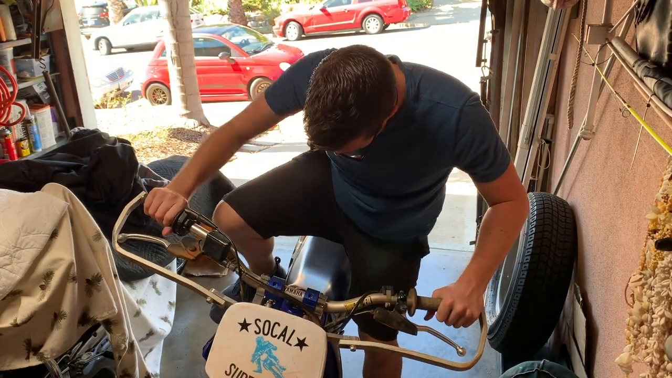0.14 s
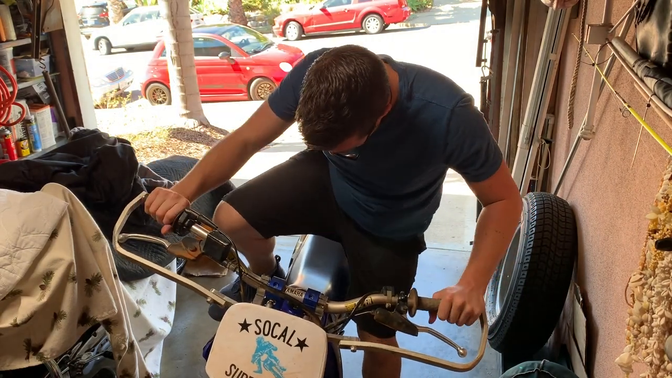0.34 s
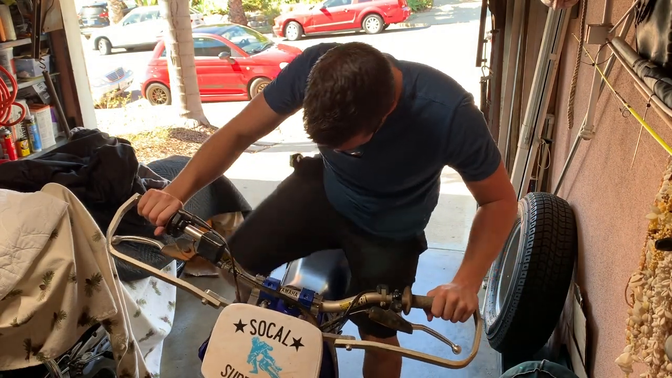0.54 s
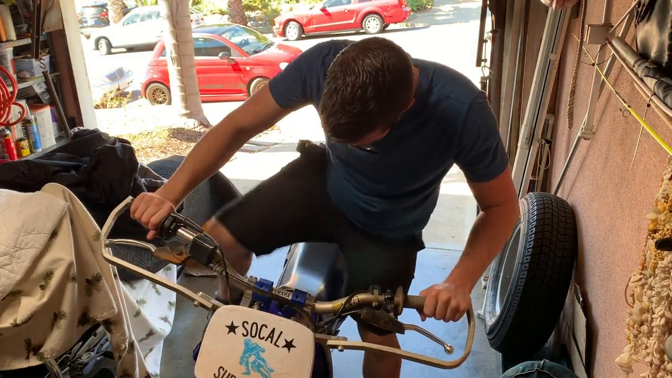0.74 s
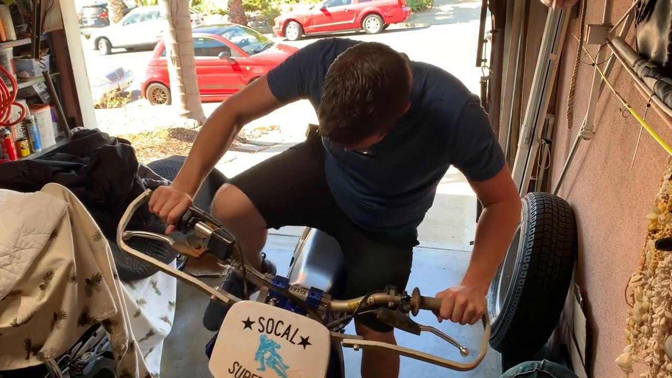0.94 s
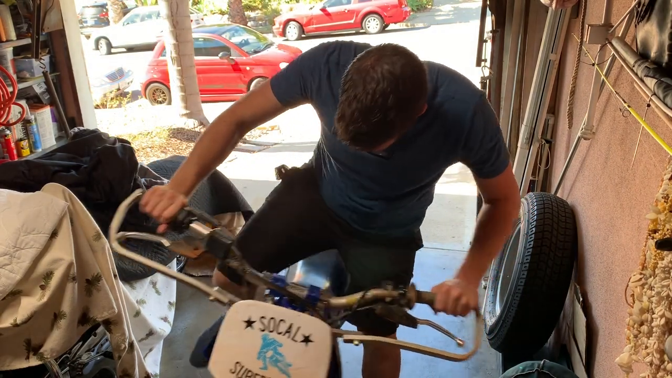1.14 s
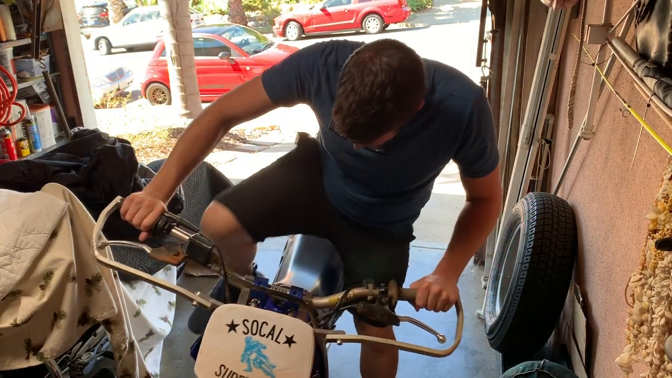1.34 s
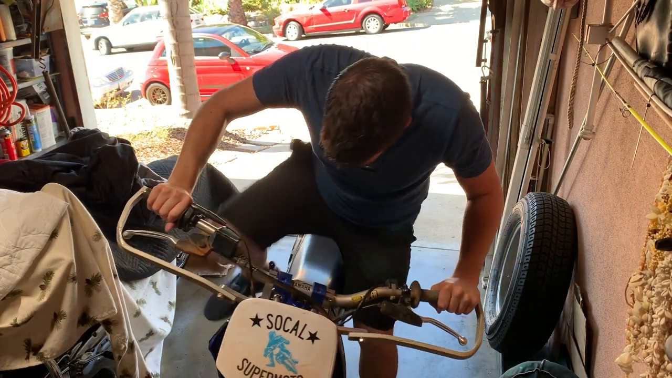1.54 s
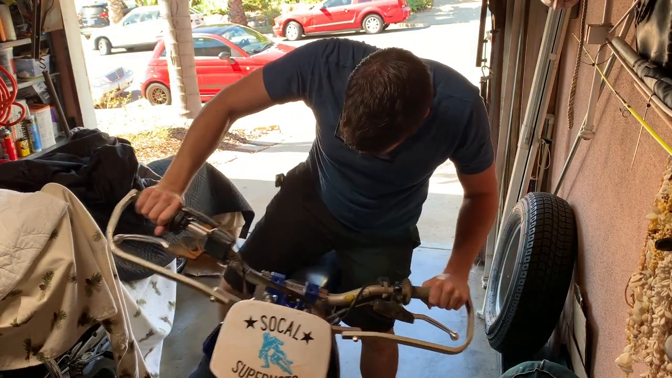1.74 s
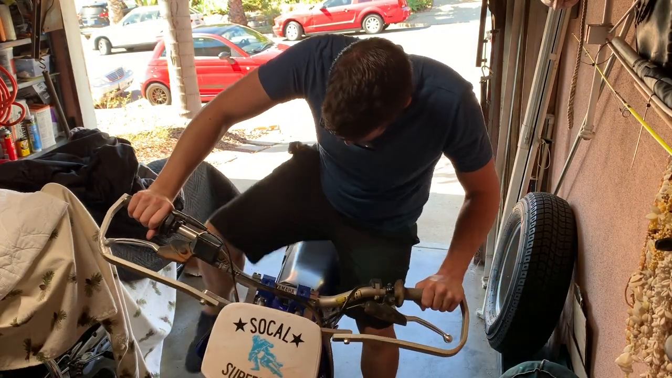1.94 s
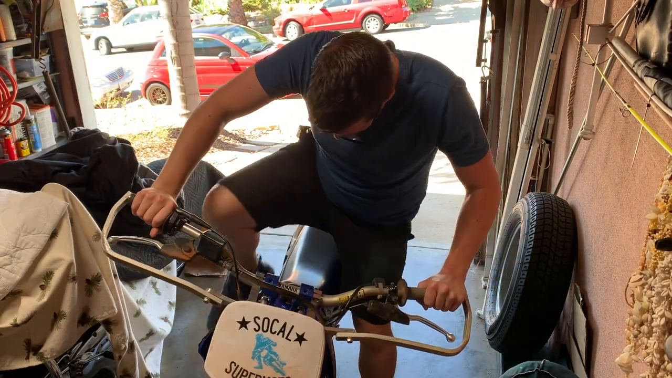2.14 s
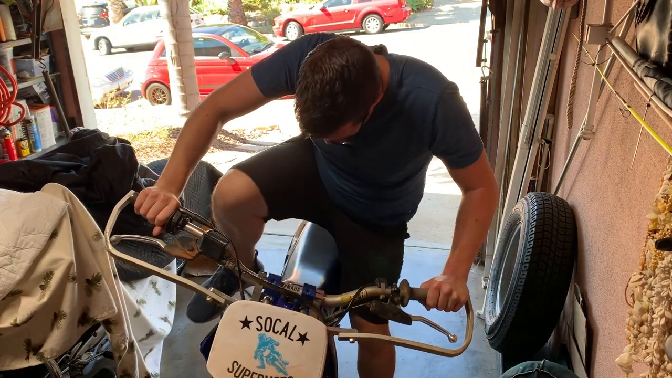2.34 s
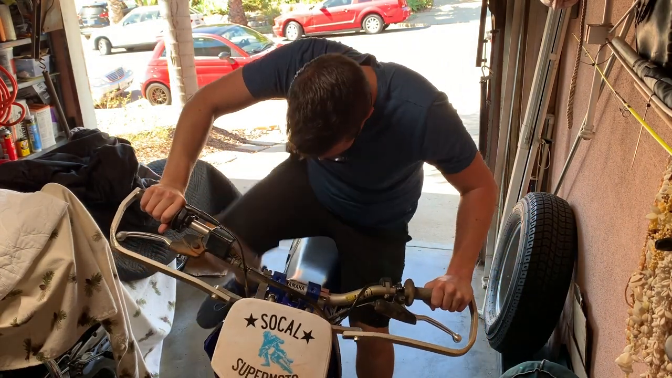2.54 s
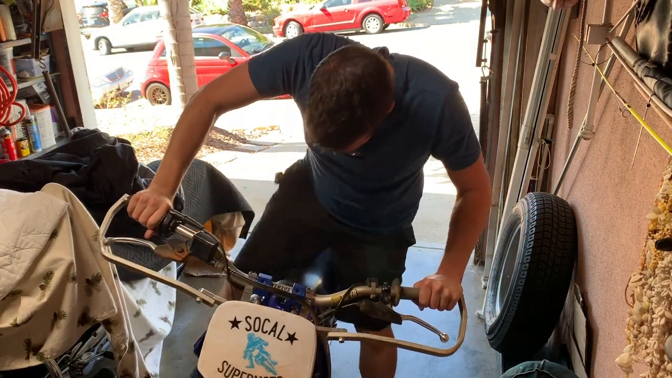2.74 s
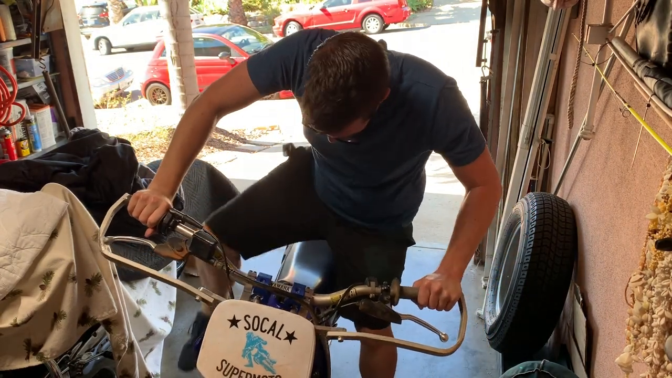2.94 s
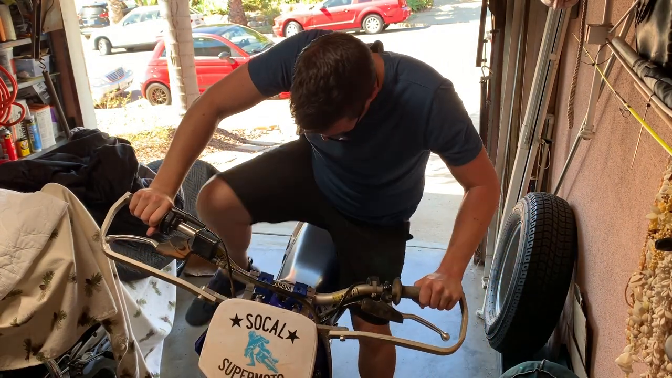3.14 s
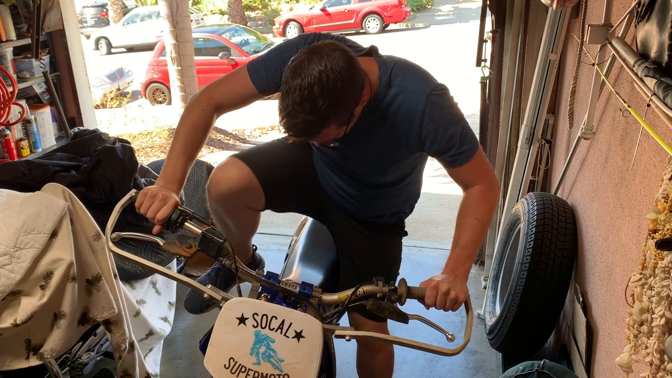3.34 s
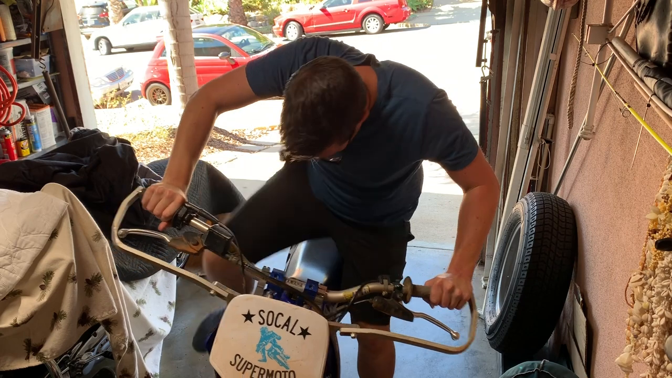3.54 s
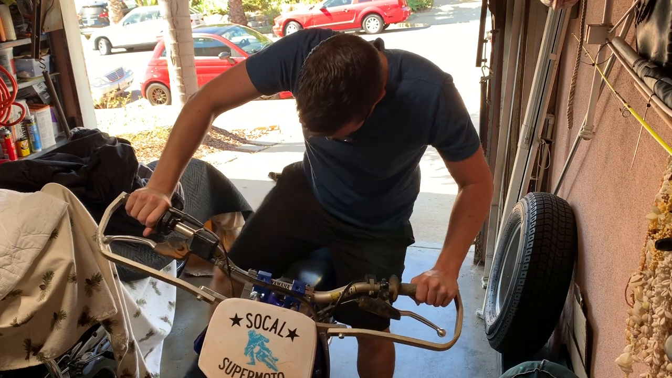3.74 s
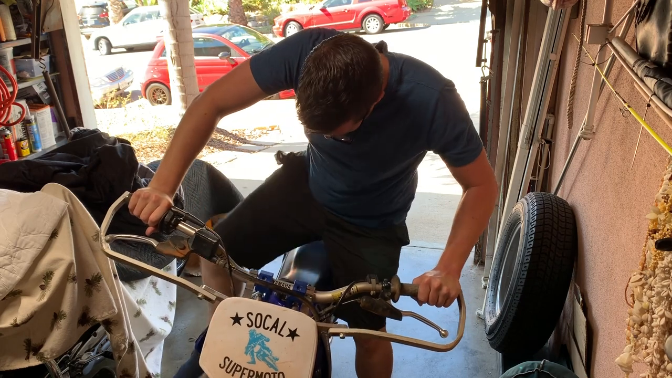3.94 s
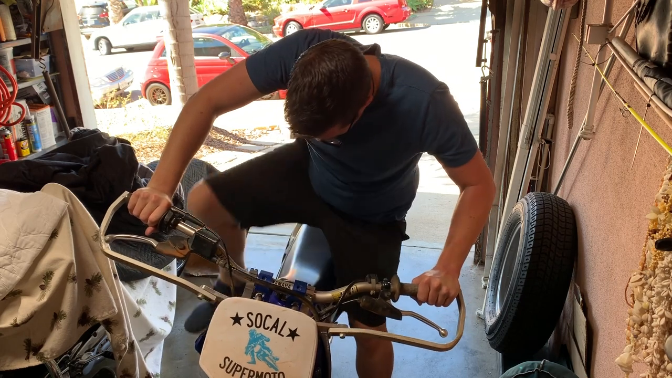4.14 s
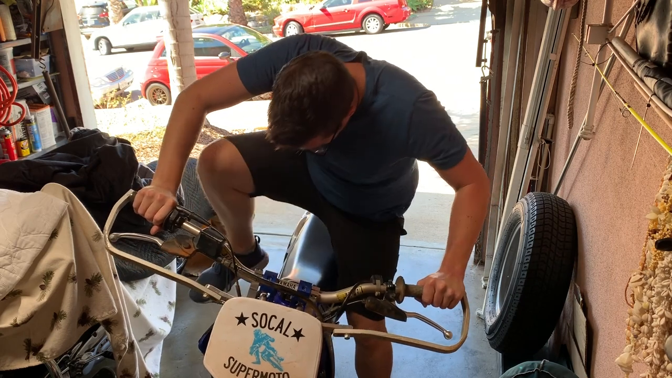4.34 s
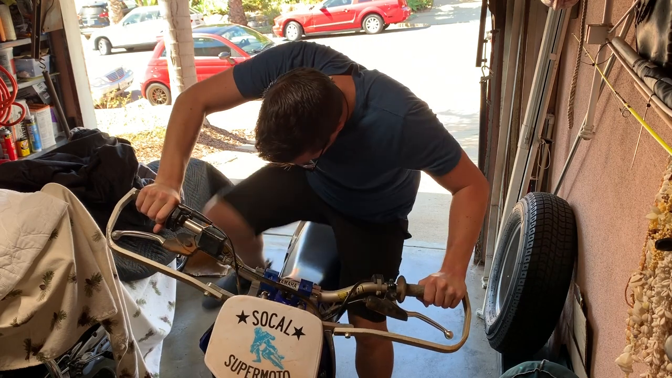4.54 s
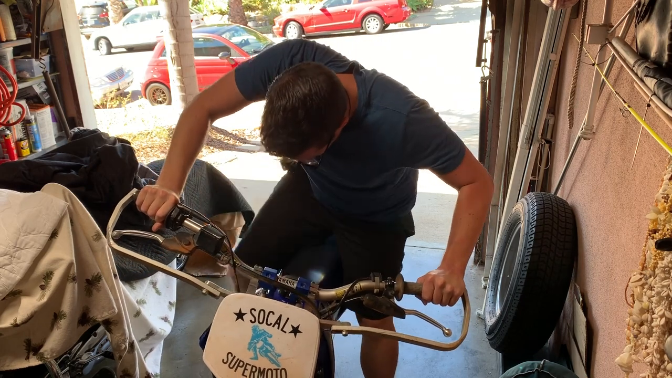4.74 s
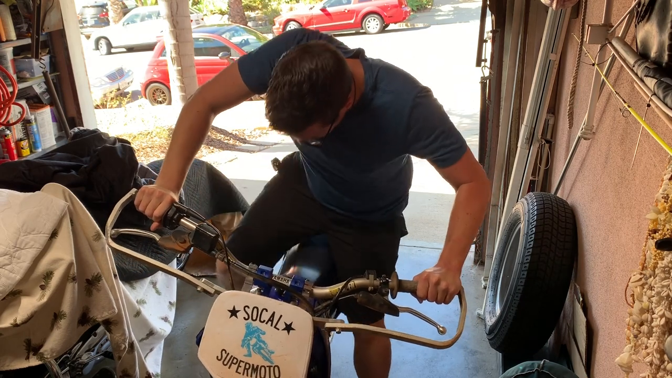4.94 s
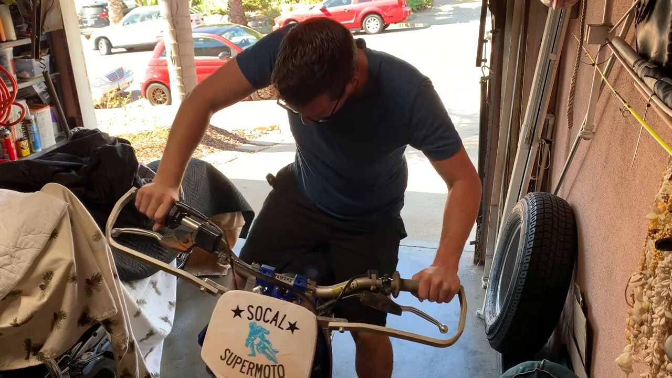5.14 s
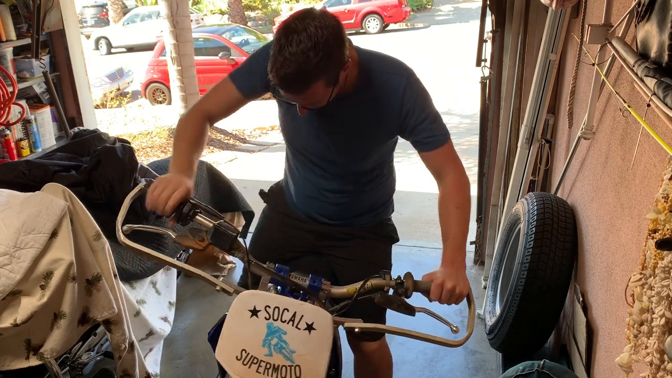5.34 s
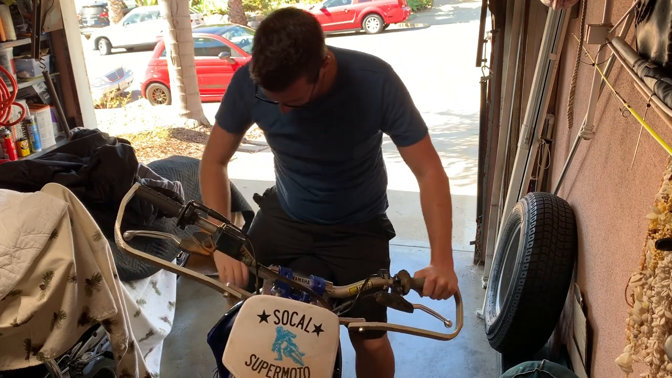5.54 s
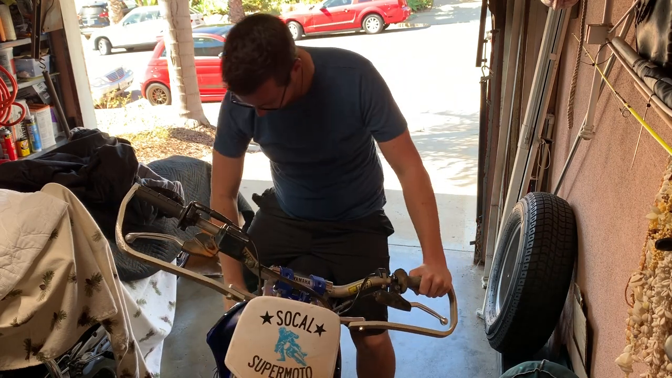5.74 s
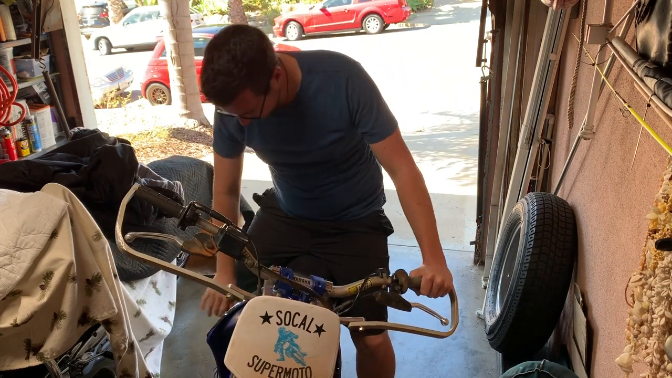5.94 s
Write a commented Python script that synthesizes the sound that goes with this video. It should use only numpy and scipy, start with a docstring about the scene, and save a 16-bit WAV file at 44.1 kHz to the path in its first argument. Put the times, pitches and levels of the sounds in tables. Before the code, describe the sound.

Close up in an open garage, a kick lever clicks and clanks as a small motorcycle engine is eased to compression. Four kicks follow about a second apart, each a knock, steel clack and deep soft puff, with scraping gears coasting down and a thin airy hiss. The last is hardest and clankiest. The engine never catches; small clacks and faint street rumble remain.

```python
"""Kick-starting in an open garage

A single-cylinder motorcycle, heard by a phone with two microphone ports, is eased up to compression,
kicked four times and never fires. Noise bursts through ringing modes make the ratchet, knocks and lever clacks;
swinging low tones make the dull puffs of the silencer. Scraping gears coast to rest, trapped air hisses,
the bike rocks, floor and wall answer, and filtered noise makes the street rumble faintly outside."""
import sys
import numpy as np
from scipy import signal
from scipy.fft import rfft, irfft, next_fast_len
from scipy.io import wavfile
from scipy.ndimage import uniform_filter1d

SR = 44100
rng = np.random.default_rng(int(sys.argv[2]) if len(sys.argv) > 2 else 0)


def master(y):
    """Save y as 16-bit WAV."""
    cut = np.clip(np.atleast_2d(y).T, -1, 1)
    pcm = np.round(cut * 32767)  # scale
    wavfile.write(sys.argv[1], SR, pcm.astype(np.int16))


N = 265041
T = np.arange(N) / SR
# Levels in the tables are relative: the mix, the garage and the overall treble curve come after them.


def undb(db):
    """Decibels to gain."""
    return 10 ** (np.asarray(db) / 20)


def unit(x):
    """Scale to rms 1."""
    return x / np.sqrt(np.mean(x ** 2))


def at_hz(points, hz):
    """Read (f/Hz, value) points on a log-frequency axis."""
    f, value = np.transpose(points)
    return np.interp(np.log(hz + 1), np.log(f), value)


def colour_by_hz(x, points):
    """Apply a (f/Hz, gain/dB) curve without shifting phase."""
    gain = undb(at_hz(points, np.fft.rfftfreq(2 * N, 1 / SR)))
    return irfft(rfft(x, 2 * N) * gain)[..., :N]


def response(points, size=4096):
    """Causal, minimum-phase impulse response of a colour, with energy 1."""
    log_gain = np.log(undb(at_hz(points, np.fft.rfftfreq(size, 1 / SR))))
    cepstrum = irfft(log_gain)
    cepstrum[1:size // 2] *= 2  # fold the acausal half onto the causal one
    cepstrum[size // 2 + 1:] = 0
    h = irfft(np.exp(rfft(cepstrum)))
    return h / np.linalg.norm(h)


def through(x, h):
    """Pass a sound through an impulse response."""
    return signal.fftconvolve(x, h)[:N]


def band(x, hz, kind, order=2):
    """Butterworth filter."""
    return signal.sosfilt(signal.butter(order, hz, kind, fs=SR, output="sos"), x)


def walk(rate):
    """Slow random drift with a spread of about 0.64, heading for a new value `rate` times a second."""
    k = int(SR / rate)
    return 0.78 * uniform_filter1d(np.repeat(rng.standard_normal(N // k + 1), k), k)[:N]


def grains(rate, spread_db):
    """Tiny contacts at random moments, `rate` per second on average and of uneven size."""
    hits = rng.random(N) < rate / SR
    size = rng.standard_normal(N) * undb(spread_db * rng.standard_normal(N))
    return unit(hits * size)


def add(track, s, sound):
    """Mix a sound in at a moment."""
    i = max(int(s * SR), 0)
    track[i:i + len(sound)] += sound[:max(N - i, 0)]


def swell(start_s, length_s, attack_s, release_s):
    """Envelope that grows up to its start, holds and dies away."""
    growth = np.minimum(T - start_s, 0) / attack_s
    decay = np.maximum(T - start_s - length_s, 0) / release_s
    return np.exp(growth - decay)


def modes(table):
    """Impulse response of (f/Hz, width/Hz, level/dB) resonances; a narrow one rings longer."""
    t = T[:SR // 3]
    return sum(undb(db) * 2 * np.pi * w / SR * np.exp(-np.pi * w * t) * np.cos(2 * np.pi * hz * t)
               for hz, w, db in table)


# Ringing modes of engine case and frame: f/Hz, width/Hz, level/dB
CASE_MODES = [(202, 35, -4), (340, 14, -3), (415, 40, -2), (530, 70, -7), (975, 16, -7), (1043, 16, -6),
              (1204, 22, -2), (1330, 25, -2), (1776, 35, -13), (2181, 30, -3), (2420, 70, -4),
              (4415, 60, -12), (6310, 60, 0), (6498, 60, -1), (9897, 25, -1), (10115, 35, -2)]


def case(force, colour, ring_db):
    """A force on the engine: a direct crack plus the ringing modes of case and frame."""
    h = undb(ring_db) * modes(CASE_MODES)
    h[0] += 1  # direct crack
    h = signal.fftconvolve(h, response(colour))
    return through(force, h / np.linalg.norm(h))


# Spectrum of distant traffic outside the garage: f/Hz, level per Hz/dB
STREET_COLOUR = [(25, -25), (40, -17), (55, -1.5), (78, 0), (105, -6.5), (160, -19), (240, -23.5),
                 (420, -29.5), (750, -31.5), (1300, -35), (2500, -47.5), (5000, -50.5), (15000, -59.5)]


def street(level_db=-46, side_db=-5, swell_db=1):
    """Distant traffic as coloured noise that slowly swells; its bass is alike at both ports."""
    mid, side = (band(through(rng.standard_normal(N), response(STREET_COLOUR)), 27, "highpass", order=3)
                 for _ in range(2))
    side = undb(side_db) * band(side, 300, "highpass")
    return np.array([mid + side, mid - side]) * undb(level_db + swell_db * walk(5.4))


# The four kicks: lever stop t/s, compression knock level/dB, its f/Hz, its dull thud level/dB,
# stop clank level/dB, stop treble level/dB, gears level/dB, coasting length/s,
# puff delay/s, puff level/dB, spacing of the strokes (0-1)
KICKS = [(1.688, -23.5, 364, 2, -22, 5, -34.5, 0.46, 0.0051, -8, 1),
         (2.704, -21.5, 360, 0.5, -11, 7, -36.5, 0.58, 0.0023, -7, 0.96),
         (3.638, -26, 373, 3.5, -12, 6, -29, 0.35, 0.002, -8.5, 0.99),
         (4.646, -8, 465.6, -6, -2.5, -1.5, -31.5, 0.23, 0.069, -14, 0.42)]
(STOP_S, COMPRESSION_DB, COMPRESSION_HZ, THUD_DB, CLANK_DB, TREBLE_DB,
 GEAR_DB, COAST_S, PUFF_DELAY_S, PUFF_DB, SPACING) = np.transpose(KICKS)
NEXT_KICK_S = np.append(STOP_S[1:], np.inf)
COMPRESSION_S = STOP_S - 0.043  # the piston meets compression just before the lever's stop
# Pawl and lever snapping against the engine case:
# t/s, level/dB, lever clank level/dB, treble level/dB, length of the chatter/s
CLACKS = [(0.079, -74, -21, 30.5, 0.0017), (0.251, -55.5, -1.5, -42, 0.012), (0.413, -58, 4.5, -36, 0.002),
          (0.484, -58, -10, -10, 0.013), (0.54, -53, -9, 1, 0.0055), (0.596, -29.5, -31, -21, 0.0025),
          (.622, -40.5, -16, -13, .004), (.724, -32.5, -11, -25, 0.0046), (.748, -41.5, -15, -18, 0.0037),
          (0.782, -33.5, -17, -3.5, 0.01), (1.002, -39.5, -6, -36, 0.05), (1.055, -31.5, -6.5, 1, 0.018),
          (1.11, -35, -23, -7, 0.0035), (1.158, -30, -32, -23, 0.0015), (1.204, -38, -16, -26.5, 0.0048),
          (1.244, -33, -27, -24.5, 0.013), (1.295, -34, -22, 0, 0.014), (1.363, -45, -17, -2, 0.012),
          (1.406, -40, 3, 1, 0.011), (1.457, -63.5, -23, 27.5, 0.016), (1.525, -37, -9, -16, 0.0059),
          (1.544, -22.5, -7.5, -13, 0.011), (2.303, -52, 4, -21, 0.0034), (2.432, -48, -1, -41, 0.0052),
          (2.488, -47, 9.5, -25, 0.011), (3.267, -45, 3.5, -14, 0.0042), (3.41, -48.5, -5.5, -19, 0.035),
          (3.48, -32, -16.5, -13.5, 0.0061), (3.535, -40.5, -6, 0.5, 0.007), (3.583, -32, -19, -9, 0.025),
          (3.669, -25, -26, -3, 0.0035), (3.728, -27.5, -25, 2.5, 0.0036), (3.754, -33.5, -23, 0.5, .005),
          (3.863, -39, -27, -2, 0.013), (4.414, -47.5, -13, -11, 0.0098), (4.499, -30.5, -5, -5, 0.036),
          (4.523, -19.5, -8.5, -23, 0.0087), (4.606, -23, -1, -3.5, 0.012), (4.633, -24, -22, 3.5, .007),
          (4.705, -22.5, -7, -7, 0.0058), (4.745, -42, -12, -14, 0.0068), (5.146, -50, -5, -27, 0.006),
          (5.32, -51.5, -17, 12, 0.008), (5.352, -36, -24, -8.5, 0.026), (5.384, -37.5, -20, 14, 0.0013),
          (5.516, -50, -9, -14, 0.0044), (5.72, -55.5, -6.5, -24.5, 0.0028),
          (5.934, -36.5, -5, -45, 0.0066)]
# Colour of steel on the case: f/Hz, level per Hz/dB
CLACK_COLOUR = [(60, 3), (250, -6.5), (500, -5.5), (750, 2.5), (1250, 1), (1650, -5.5), (2300, -1.5),
                (3000, -3), (4500, -4.5), (6400, -4), (10000, -2.5), (12500, -2), (15500, -12)]
# The steel lever's own clank: f/Hz, width/Hz, level/dB
LEVER_MODES = [(1095, 40, -8), (1204, 26, -3), (1330, 34, 0), (1780, 70, -20)]


def clacks(rise_share=0.47, fall_s=0.02, rattle_db=-16, rattle_s=0.048, uneven_db=2, split_hz=4200,
           ring_db=4, case_db=-3, lever_db=-3, stop_db=-12.5, stop_chatter_s=0.0094):
    """Steel chatters on steel for some milliseconds, then loose parts rattle out; the lever clanks along."""
    on_case, on_lever, t = np.zeros(N), np.zeros(N), T[:SR // 4]
    stops = [(s, stop_db, clank_db, treble_db, stop_chatter_s)
             for s, clank_db, treble_db in zip(STOP_S, CLANK_DB, TREBLE_DB)]
    for s, db, clank_db, treble_db, chatter_s in stops + CLACKS:
        contact = np.exp(-np.maximum(t - chatter_s, 0) / fall_s)
        loose_parts = undb(rattle_db) * np.exp(-t / rattle_s)
        rise = np.minimum(t / (rise_share * chatter_s), 1)  # a long contact starts softly
        steps = np.repeat(rng.standard_normal(len(t)), 40)[:len(t)]  # a new strength every 40 samples
        chatter = unit(undb(uneven_db * steps) * rng.standard_normal(len(t)))
        blow = undb(db) * rise * chatter * (contact + loose_parts)
        treble = undb(treble_db) * band(blow, split_hz, "highpass")
        add(on_case, s, band(blow, split_hz, "lowpass") - treble)
        add(on_lever, s, undb(clank_db) * blow)
    lever = modes(LEVER_MODES)
    clank = through(on_lever, lever / np.linalg.norm(lever))
    return undb(case_db) * case(on_case, CLACK_COLOUR, ring_db) + undb(lever_db) * clank


# Small steel parts that ping when flicked: t/s, level/dB, f/Hz
PINGS = [(0.085, -37, 6740), (1.075, -50, 15300), (1.461, -24, 15400), (1.465, -22, 12050),
         (2.712, -3.5, 6370), (5.384, -13, 7420), (0.789, -30.5, 4500), (1.464, -34, 5000)]


def pings(width_hz=260, fall_s=0.0035):
    """A short, bright ring: a narrow band of noise that dies away at once."""
    out, t = np.zeros(N), T[:SR // 6]
    for s, db, hz in PINGS:
        edges = [hz - width_hz / 2, hz + width_hz / 2]
        ring = unit(band(rng.standard_normal(len(t)), edges, "bandpass"))
        add(out, s, undb(db) * ring * np.exp(-t / fall_s))
    return out


# The rider shifts his weight: start t/s, length/s, level/dB
SHIFTS = [(0.41, 0.23, -50), (1.088, 0.13, -39), (1.371, 0.22, -41), (2.323, 0.032, -56.5),
          (3.503, 0.08, -38.5), (5.171, 0.047, -50.5), (5.504, 0.23, -47.5)]
# Colour of the low rubbing: f/Hz, level per Hz/dB
SHUFFLE_COLOUR = [(40, -12.5), (110, 14), (160, 7.5), (215, 6), (450, 0), (750, -6.5), (1500, -14.5),
                  (5000, -43.5)]


def shuffle(jolt_db=-32, jolt_s=0.06, rock_db=-44, settle_s=0.53, attack_s=0.0084, release_s=0.071):
    """Low rubbing of boot and springs: each kick jolts and rocks the bike, and the rider shifts his weight."""
    rubs = grains(rate=700, spread_db=2)
    rocking = sum(undb(jolt_db) * swell(s, 0, attack_s, jolt_s)
                  + undb(rock_db) * swell(s, 0, attack_s, settle_s) for s in STOP_S)
    shifting = sum(undb(db) * swell(s, length_s, attack_s, release_s) for s, length_s, db in SHIFTS)
    return case(rubs, SHUFFLE_COLOUR, ring_db=1.0) * (rocking + shifting)


# The frame knocks as the ratchet takes up or the lever comes back:
# t/s, level/dB, f/Hz, dull thud level/dB
KNOCKS = [(0.417, -47, 460, 0.5), (0.599, -45, 460, 2.5), (1.066, -20.5, 395, -10),
          (1.084, -13.5, 156, -24), (1.118, -34.5, 228, 4.5), (1.411, -32, 382, -20),
          (1.558, -27.5, 387, 8.5), (2.308, -40, 490, -4), (2.344, -51, 512, -9), (2.474, -37, 500, -4),
          (2.495, -40, 526, 4), (2.578, -28, 305, -10), (2.591, -28, 285, -6), (3.262, -37.5, 472, 1),
          (3.519, -35, 454, 2), (3.734, -32, 226, -13), (4.536, -14.5, 409, -5.5), (4.658, -17, 390, -3.5),
          (4.717, -18, 457, -4), (4.745, -30.5, 509, -15), (5.144, -36.5, 548, -7), (5.179, -37.5, 484, -1),
          (5.38, -43, 249, 8.5), (5.566, -34, 218.5, -7), (5.615, -33, 179, -8.5), (5.631, -37, 449, -10),
          (5.695, -39.5, 466, -7), (5.753, -36.5, 209.4, -6.5), (5.848, -45.5, 413, 6.5),
          (5.938, -44.5, 500, 9)]
# Colour of heavy, soft blows: f/Hz, level per Hz/dB
KNOCK_COLOUR = [(40, -13), (100, 12.5), (160, -7.5), (215, 0), (420, -1), (560, -6), (750, -36),
                (1300, -24), (3000, -68), (12000, -35)]


def knocks(fall_s=0.022, boom_s=0.016, ring_db=0, boom_db=4, stop_db=-20.5, stop_hz=530, stop_thud_db=2):
    """Heavy, soft blows at take-up, compression and stop; each booms at the pitch of the part it lands on."""
    force, t = np.zeros(N), T[:SR // 6]
    compressions = list(zip(COMPRESSION_S, COMPRESSION_DB, COMPRESSION_HZ, THUD_DB))
    stops = [(s, stop_db, stop_hz, stop_thud_db) for s in STOP_S]
    for s, db, hz, thud_db in compressions + stops + KNOCKS:
        thud = undb(thud_db) * np.exp(-t / fall_s) * rng.standard_normal(len(t))
        boom = np.exp(-t / boom_s) * np.sin(2 * np.pi * hz * t) * np.sqrt(hz / SR)
        add(force, s, undb(db) * (thud + undb(boom_db) * boom))
    return case(force, KNOCK_COLOUR, ring_db)


# The lever moved slowly, turning the gears: start t/s, length/s, build-up/s, level/dB, ticking level/dB
TURNS = [(0.574, 0.06, 0.063, -42, -66), (0.717, 0.12, 0.082, -47, -68), (1.093, 0.24, .01, -42.5, -50),
         (1.352, 0.23, .01, -48, -42.5), (4.992, 0.058, 0.03, -56.5, -77), (5.17, 0.15, .02, -55.5, -92),
         (5.495, 0.14, 0.021, -63, -89.5), (5.969, 0.033, .008, -46.5, -60)]


def gear_drive(spin_up_s=0.078, coast_drop_db=24, kick_ticking_db=-52, ticking_fade_s=0.37,
               attack_s=0.0083, release_s=0.012):
    """Strength of scrape and ticking: a kick spins gears up and they coast down; a slow turn holds steady."""
    scrape, ticking = 0, 0
    for load_s, stop_s, db, coast_s in zip(COMPRESSION_S, STOP_S, GEAR_DB, COAST_S):
        fade_s = coast_s / np.log(undb(coast_drop_db))  # falls by coast_drop_db within coast_s
        onset = np.clip((T - load_s) / spin_up_s + 2, 0, 1)
        scrape = scrape + undb(db) * swell(stop_s, 0, spin_up_s, fade_s) * onset
        kick_ticking = swell(load_s, stop_s - load_s, attack_s, ticking_fade_s)
        ticking = ticking + undb(kick_ticking_db) * kick_ticking
    for s, length_s, build_s, db, ticking_db in TURNS:
        turning = swell(s, length_s, build_s, release_s)
        scrape = scrape + undb(db) * turning
        ticking = ticking + undb(ticking_db) * turning
    return scrape, ticking


# Ringing gear wheels and pawl: f/Hz, width/Hz, level/dB
WHEEL_MODES = [(1050, 13, -4.5), (1138, 23, 7), (1284, 40, -3.5), (1583, 57, -3), (1800, 80, -4.5),
               (2030, 60, -4.5), (2520, 60, -5), (2690, 140, -4), (3190, 45, -1), (3880, 55, -5),
               (4290, 160, -7.5), (4960, 82, -10)]


def ratchet(drops_per_s=210, uneven_db=2.5, shift_db=3.5, shifts_per_s=25):
    """The pawl drops over the teeth at uneven moments; each drop rings the wheels in a shifting mix."""
    when = np.cumsum(rng.uniform(.3, 1.7, 4000)) / drops_per_s
    at = (when[when < T[-1]] * SR).astype(int)
    size = undb(uneven_db * rng.standard_normal(len(when)))
    out = 0
    for wheel in WHEEL_MODES:
        drops = np.zeros(N)
        drops[at] = (size * rng.standard_normal(len(when)))[:len(at)]
        out = out + through(drops * undb(shift_db * walk(shifts_per_s)), modes([wheel]))
    return unit(band(out, [700, 6000], "bandpass"))


# Colour of scraping teeth: f/Hz, level per Hz/dB
GEAR_COLOUR = [(80, -11), (300, 6.5), (700, 1), (1300, 2), (1800, -8.5), (2800, -8.5), (4500, -4.5),
               (7000, -10), (11000, -7), (15500, -14)]


def gears(tooth_hz=110, gear_db=-1, ticking_db=-1, ratchet_db=-2):
    """Teeth scrape past each other in uneven bursts; the pawl adds a metallic rattle and fine ticking."""
    turn = np.cumsum(tooth_hz * undb(1.5 * walk(7.7))) / SR  # the tooth rate drifts
    mesh = unit((1 + .3 * np.cos(2 * np.pi * turn)) * undb(2 * walk(35)))
    contacts = grains(rate=7000, spread_db=1) * mesh
    scrape = case(contacts, GEAR_COLOUR, ring_db=10.0) + undb(ratchet_db) * ratchet()
    ticking = unit(band(contacts, 11000, "highpass"))
    scrape_gain, ticking_gain = gear_drive()
    return unit(scrape) * scrape_gain * undb(gear_db) + ticking * ticking_gain * undb(ticking_db)


# Square blows that make the steel lever clunk: t/s, level/dB, f/Hz, decay/s
CLUNKS = [(0.595, -22.5, 1200, 0.0072), (0.736, -39.5, 1223, 0.012), (1.057, -23.5, 1276, 0.0056),
          (1.162, -70, 1200, 0.0082), (1.364, -37, 1098, .012), (1.41, -29.5, 1700, 0.0086),
          (1.547, -25.5, 1192, 0.013), (1.549, -28, 1800, 0.017), (2.432, -41.5, 1212, .018),
          (2.492, -30, 1200, .011), (3.266, -45, 1157, 0.016), (3.415, -49, 1303, .025),
          (3.532, -42.5, 1200, 0.014), (3.669, -19, 1193, 0.008), (3.711, -29.5, 2630, 0.0064),
          (3.73, -24, 3250, 0.0066), (4.528, -17.5, 1187, 0.011), (4.605, -13, 1216, 0.0082),
          (4.65, -3.5, 1294, 0.0051), (4.655, -13, 2240, .007), (4.662, -16, 1040, 0.011),
          (4.707, -17, 1286, .008), (4.747, -35, 1089, 0.011), (5.146, -31.5, 530, 0.014),
          (5.934, -38, 822, 0.011)]


def clunks(rise_s=0.0027):
    """The lever bends under a square blow and rings briefly in a pair of close modes."""
    out, t = np.zeros(N), T[:SR // 4]
    for s, db, hz, fall_s in CLUNKS:
        ring = np.sin(2 * np.pi * hz * t) + .5 * np.sin(2 * np.pi * 1.04 * hz * t)
        add(out, s, undb(db) * (1 - np.exp(-t / rise_s)) * np.exp(-t / fall_s) * ring)
    return out


# The boot scuffs on the lever: start t/s, length/s, level/dB
SCUFFS = [(1.369, 0.18, -44.5), (2.31, 0.026, -52), (2.398, 0.016, -49.5), (2.498, 0.022, -44.5),
          (5.156, 0.03, -51.5), (5.532, 0.21, -57)]


def scuffs(low_hz=450, high_hz=1300, attack_s=0.01, release_s=0.0083):
    """The boot's sole sticks and slips on the lever in short, grainy rubs."""
    contacts = case(grains(rate=500, spread_db=3), GEAR_COLOUR, ring_db=3)
    rub = unit(band(contacts, [low_hz, high_hz], "bandpass"))
    return rub * sum(undb(db) * swell(s, length_s, attack_s, release_s) for s, length_s, db in SCUFFS)


# Piston strokes of one kick, the first by far the strongest:
# delay/s before the kick's spacing scales it, starting f/Hz, level/dB, length of the push/s
STROKES = [(0, 69.3, 0, 0.028), (0.136, 81.2, -15.5, 0.08), (0.243, 60, -19, 0.054),
           (.326, 60.4, -18, 0.075)]


def puffs(sag=0.025, overtone_db=-25, rasp_db=-27, rise_s=0.011, fall_s=0.019):
    """While the crank turns, each stroke swings the air in the silencer; the swing dies once the valve shuts."""
    out, t = np.zeros(N), T[:SR // 4]
    for s, kick_db, coast_s, spacing in zip(COMPRESSION_S + PUFF_DELAY_S, PUFF_DB, COAST_S, SPACING):
        for delay_s, hz, db, push_s in STROKES:
            if delay_s < coast_s:
                swing = (1 - np.exp(-t / rise_s)) * np.exp(-np.maximum(t - push_s, 0) / fall_s)
                phase = 2 * np.pi * hz * t * (1 - sag * t)  # the crank slows
                rasp = undb(rasp_db) * unit(band(rng.standard_normal(len(t)), [120, 480], "bandpass"))
                tone = -np.sin(phase) + undb(overtone_db) * np.sin(3 * phase)
                add(out, s + spacing * delay_s, undb(kick_db + db) * swing * (tone + rasp))
    return out


# The hiss sings in a few close resonances: f/Hz, width/Hz, level/dB
HISS_TONES = [(2870, 70, -9), (3045, 36, -4), (3103, 18, 2), (3263, 15, 5)]
# After each kick: hiss level/dB, a second level/dB that is not played
AFTER_KICKS = [(-56.5, -55), (-53, -52), (-58, -52), (-76, -43)]


def hiss(attack_s=0.044, hold_s=0.22, leak_s=0.42, sizzle_db=-11, rush_db=-9,
         rush_low_hz=2400, rush_high_hz=4200):
    """Air trapped by each kick leaks out: a wavering whistle over a rush and sizzle, until the next kick."""
    airy = through(rng.standard_normal(N), modes(HISS_TONES))
    airy = band(airy, [2650, 3400], "bandpass", order=4)
    clear = 0
    for hz, width, db in HISS_TONES:
        cycles = np.cumsum(hz + width / 2 * walk(30)) / SR
        clear = clear + undb(db) * np.sin(2 * np.pi * cycles)
    whistle = unit(unit(airy) + unit(clear))
    rush = band(rng.standard_normal(N), [rush_low_hz, rush_high_hz], "bandpass", order=1)
    sizzle = band(rng.standard_normal(N), 9000, "highpass") * undb(3 * walk(9))
    pressure = sum(undb(kick[0]) * swell(s, hold_s, attack_s, leak_s) * (T < end_s)
                   for s, end_s, kick in zip(STOP_S, NEXT_KICK_S, AFTER_KICKS))
    return (whistle + undb(rush_db) * unit(rush) + undb(sizzle_db) * unit(sizzle)) * pressure


def rattles(rattle_db=-60, settle_s=0.43, attack_s=0.03):
    """Loose parts keep ticking faintly while the bike rocks after a kick."""
    ticks = case(grains(rate=2000, spread_db=2), CLACK_COLOUR, ring_db=-7.0)
    rocking = sum(swell(s, 0, attack_s, settle_s) * (T < end_s) for s, end_s in zip(STOP_S, NEXT_KICK_S))
    return ticks * undb(rattle_db) * rocking


def flatten_humps(h):
    """Flatten the humps that the noise draw gives the tail, so the room's colour stays even."""
    hz = np.fft.rfftfreq(len(h), 1 / SR)
    power = np.abs(rfft(h)) ** 2
    # power smoothed over 220 Hz against power smoothed over 3000 Hz
    humps = uniform_filter1d(power, int(220 / hz[1])) / uniform_filter1d(power, int(3000 / hz[1]))
    flatten = response(np.column_stack([hz + 1, -10 * np.log10(humps)]))
    even = signal.fftconvolve(h, flatten)[:len(h)]
    return even * np.linalg.norm(h) / np.linalg.norm(even)


# Decay of the garage's tail, before the early boost: f/Hz, t60/s
GARAGE_DECAY = [(100, 0.055), (500, 0.27), (1300, 0.19), (3000, 0.36), (6000, 0.09), (14000, 0.12)]
# How unlike the two microphone ports hear the reflections; long waves reach both alike: f/Hz, level/dB
PORT_SPREAD = [(60, -28), (150, -16), (280, -9), (500, -1), (1000, -5), (2000, 1), (4000, -3), (8000, 3),
               (14000, 3)]


def garage(x, early_db=4, early_s=0.0084, wet_db=-8):
    """Floor and wall answer the direct sound at once, the clutter follows with a short tail."""
    t = T[:2 * SR // 3]
    edges_hz = [110, 300, 700, 1600, 3200, 6000, 10000, 21000]
    early = 1 + undb(early_db) * np.exp(-t / early_s)

    def tail():
        """Noise in bands, each dying away at its own rate."""
        out = 0
        for lo, hi in zip(edges_hz, edges_hz[1:]):
            decay = np.exp(-np.log(1000) * t / at_hz(GARAGE_DECAY, np.sqrt(lo * hi)))
            out = out + band(rng.standard_normal(len(t)), [lo, hi], "bandpass", order=3) * decay
        return early * out

    mid, side = tail(), tail()
    direct = t == 0
    mid = through(x, flatten_humps(direct + undb(wet_db) * mid / np.linalg.norm(mid)))
    side = through(x, flatten_humps(side / np.linalg.norm(side)))
    side = colour_by_hz(side, PORT_SPREAD)
    return np.array([mid + side, mid - side])


def scene(bike_db=-3, puff_pan_db=-1.37, frame_side_db=-5):
    """The bike in the garage, the street behind it; the wide frame's ring reaches the ports out of step."""
    metal = clacks() + pings() + shuffle() + knocks() + gears() + clunks() + scuffs() + hiss() + rattles()
    metal = undb(bike_db) * metal
    frame_filter = signal.butter(2, [370, 800], "bandpass", fs=SR, output="sos")
    frame = signal.sosfiltfilt(frame_filter, metal)
    # a quarter cycle late, with opposite sign at the two ports
    side = undb(frame_side_db) * signal.hilbert(frame, next_fast_len(N)).imag[:N]
    puff_gains = undb(np.array([[puff_pan_db], [-puff_pan_db]]) / 2)
    return garage(metal) + np.array([side, -side]) + puffs() * puff_gains + street()


# Overall treble curve: softer treble with two narrow dips near 8.5 and 13.6 kHz: f/Hz, gain/dB
TREBLE_CURVE = [(20, 0), (2500, 0), (4500, -1.2), (7600, -3), (7950, -6), (8350, -23), (8700, -22),
                (9300, -3.5), (12400, -3), (13000, -13), (13600, -27), (14300, -11), (15000, 0), (20000, 0)]


def record(dry):
    """The phone drops the deepest bass, shapes the treble, rounds the loudest peaks and cuts the top."""
    dry = band(dry, 37, "highpass", order=3)
    dry = np.tanh(colour_by_hz(dry, TREBLE_CURVE))
    top_cut = signal.ellip(10, .2, 100, 16000, fs=SR, output="sos")  # 0.2 dB ripple, 100 dB down, 16 kHz
    return signal.sosfilt(top_cut, dry)


dry = scene()
out = record(dry)
master(out)
```